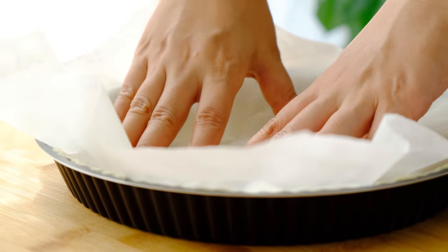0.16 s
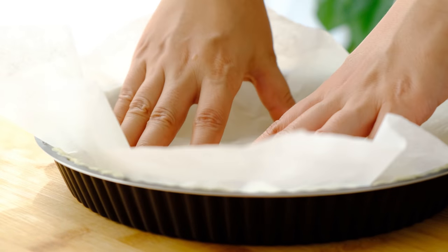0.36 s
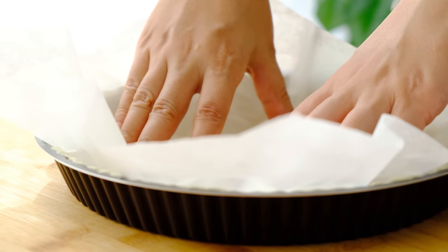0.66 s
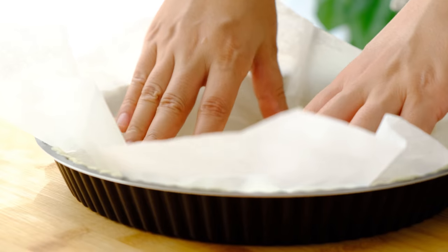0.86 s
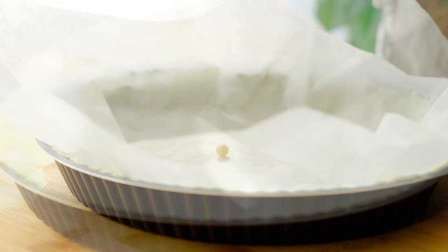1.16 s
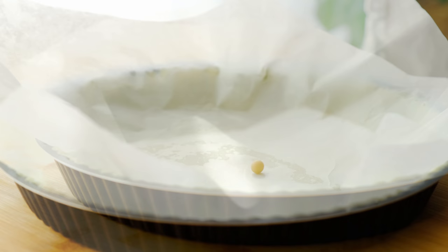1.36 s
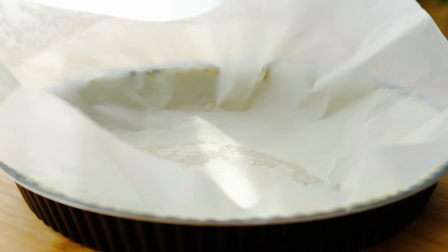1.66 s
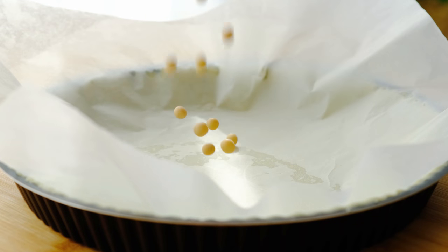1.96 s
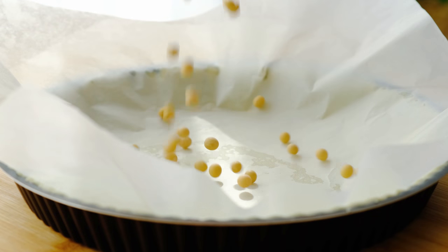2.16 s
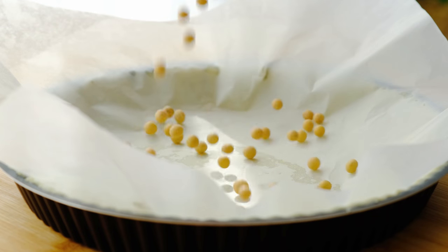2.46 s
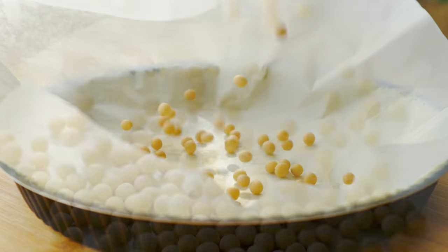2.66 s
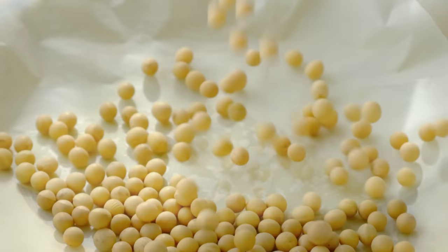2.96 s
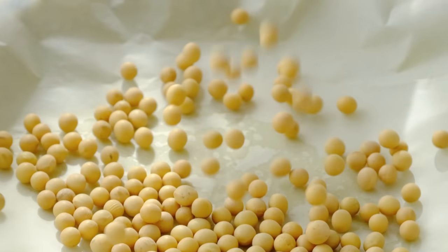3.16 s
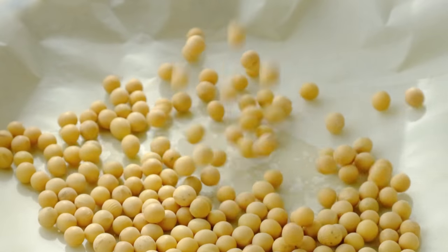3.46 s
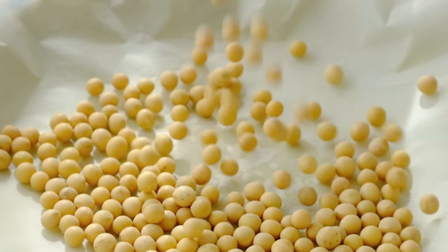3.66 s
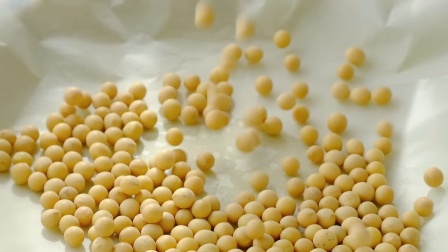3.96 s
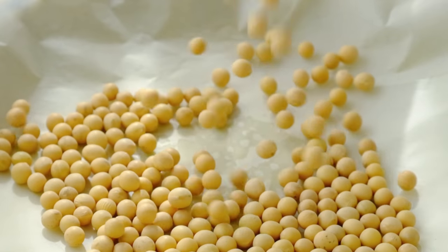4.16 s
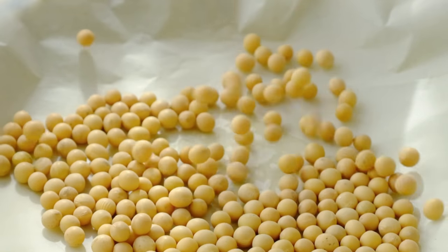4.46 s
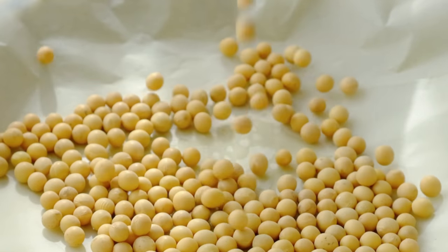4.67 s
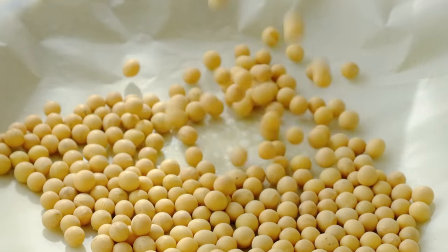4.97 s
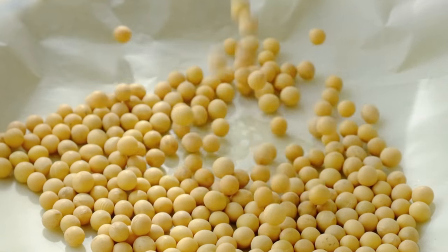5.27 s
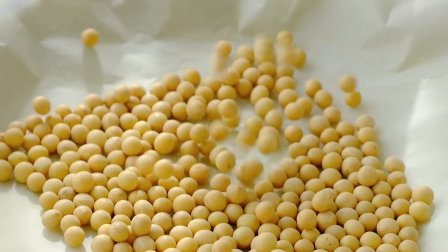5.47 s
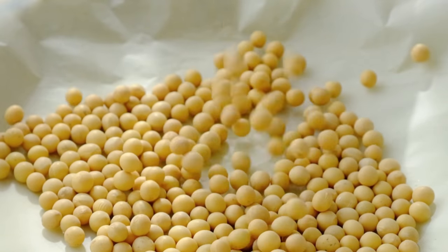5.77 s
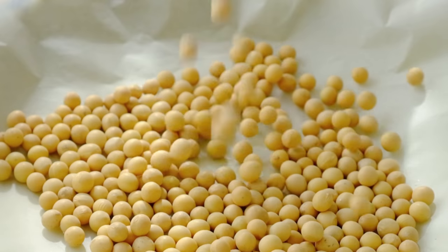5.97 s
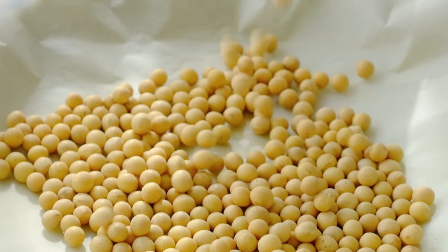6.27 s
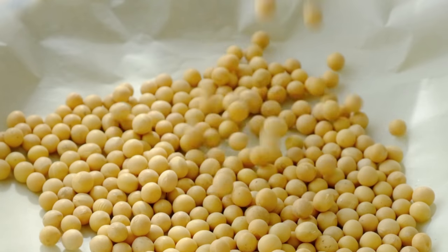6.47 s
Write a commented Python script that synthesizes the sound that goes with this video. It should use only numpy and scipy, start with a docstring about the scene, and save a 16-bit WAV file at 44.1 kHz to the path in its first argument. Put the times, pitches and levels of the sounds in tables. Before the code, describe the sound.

A close, detailed kitchen sound with short room reflections and thin bass. A faint low hum lies underneath at first and fades away. From 0 to 0.3 seconds stiff baking paper is pressed into a metal tin, crackling with dense creaks and bright ringing snaps; a pause, another crisp burst at 0.45 to 0.65, then smaller crinkles around 0.8 and single ticks until 1.1. It is nearly quiet until about 1.4. The first dried beans then tap, drum hollowly and roll on the bare sheet, becoming brighter and more crowded from 1.9 to 2.6, with a brief thinning near 2.7. At 2.8 a steady stream starts hitting other beans: hard, tiny, bright clicks over dry patter and pings, unevenly clumped, with occasional louder clicks and dull knocks. The tin's low drumming and hollow note slowly grow until the sound ends, still pouring, at 6.6.

```python
"""An appliance hums while baking paper is pressed into a tart tin and crinkles: ringing snaps over dense creaks.
The first dried beans drum and roll on the bare sheet: more snaps over low and bright rustle.
Then a steady stream rattles onto the growing heap: millisecond bean-on-bean clicks over patter, pings
and the longer drumming of the tin. A small kitchen answers with decaying noise."""
import sys
import numpy as np
from scipy import signal
from scipy.fft import rfft, irfft, next_fast_len
from scipy.io import wavfile
from scipy.ndimage import uniform_filter1d, map_coordinates

SR = 44100
rng = np.random.default_rng(int(sys.argv[2]) if len(sys.argv) > 2 else 0)


def bounce(signal):
    """Save signal as a 16-bit WAV file at the path given by the first command-line argument."""
    frames = np.transpose(np.atleast_2d(signal))
    limited = np.clip(frames, -1, 1)
    pcm = np.round(limited * 32767).astype(np.int16)
    wavfile.write(sys.argv[1], SR, pcm)


N = 291942


def amp(db):
    """Amplitude factor of a level in dB."""
    return 10 ** (np.asarray(db) / 20)


def unit(x):
    """x at an rms of one."""
    return x / np.sqrt(np.mean(x ** 2) + 1e-20)


def along(points, hz):
    """Interpolate (Hz, value) points on a log frequency axis."""
    f, v = np.transpose(points)
    return np.interp(np.log(hz + 1), np.log(f + 1), v)


def curves(rows):
    """One curve in dB per column after the time; -120 dB outside the rows."""
    s, *cols = np.transpose(rows)
    return [np.interp(np.arange(N) / SR, s, c, left=-120, right=-120) for c in cols]


def filtered(x, response):
    """Multiply the spectrum of x by a response of frequency."""
    m = next_fast_len(N + SR // 2)
    return irfft(rfft(x, m) * response(np.fft.rfftfreq(m, 1 / SR)), m)[:N]


def resonate(x, modes, order=1):
    """Causal resonances of alternating sign, applied order times; white noise keeps its level."""
    def shape(f):
        total = 0
        for k, (centre, width, db) in enumerate(modes):
            damping = 1j * f * width
            total = total + (-1) ** k * amp(db) * damping / (centre * centre - f * f + damping)
        return total ** order

    return filtered(x, shape) / np.sqrt(np.mean(abs(shape(np.arange(SR // 2))) ** 2))


def bursts(s, db, rise, t60):
    """Noise puffs that peak at times s: envelope slopes of 60 dB per rise seconds up and per t60 down."""
    t = np.arange(-SR // 20, SR // 20) / SR
    shape = amp(np.where(t < 0, 60 * t / rise, -60 * t / t60))
    blows = np.bincount(np.clip((s * SR).astype(int), 0, N - 1), amp(db), N)
    return signal.fftconvolve(blows, shape, "same") * np.sign(rng.standard_normal(N))


def rings(s, db, hz, cycles, swell=1.0):
    """Damped sines: each swells on a scale of swell cycles under a decay of 60 dB per given cycles."""
    t = np.arange(SR // 40) / SR
    turn = hz[:, None] * t
    decay = amp(db[:, None] - 60 * turn / np.reshape(cycles, (-1, 1)))
    wave = decay * (1 - np.exp(-turn / swell)) ** 2 * np.sin(2 * np.pi * turn)
    at = (s[:, None] * SR).astype(int) + np.arange(len(t))
    return np.bincount(at.ravel(), wave.ravel(), N + SR)[:N]


def swarm(count, spread_db, clump_db):
    """Random contact times in s and levels in dB; sizes have a long tail and come in clumps."""
    u = rng.random((count, 2))
    s = (np.arange(count) + 3 * u[:, 0]) / (count + 3) * N / SR  # a steady stream leaves no long gaps
    knots = rng.standard_normal(400)
    clumps = clump_db * map_coordinates(knots, [s * SR / N * 399])
    return s, -spread_db * np.log(1 - u[:, 1]) + clumps


def levelled(x):
    """Even out the slow level so that a control curve sets it."""
    return x / np.sqrt(abs(uniform_filter1d(x ** 2, size=SR // 12)) + 1e-12)


# Hum tones. Each row: pitch in Hz, rms level in dB before fade and waver.
HUM_TONES = [(99, -62.5), (199, -71.5)]
# Hum fade. Each row: time in seconds, gain of the first tone in dB, gain of the second in dB.
HUM_FADE = [(0, 0.5, -6.5), (1.351, -9, -4.5), (1.45, -4, -22), (1.7, -8, -20), (1.78, -13.5, -31),
            (6.62, -27, -30)]
# Spectrum shapes of still room and rumble. Each row: frequency in Hz, relative level in dB per Hz.
AIR_SHAPE = [(150, -42), (250, -5), (557, -8), (1160, -13), (1950, -8.5), (2910, -12.5), (3520, -8.5),
             (16000, -34)]
RUMBLE_SHAPE = [(15, -27.5), (40, 20), (150, 1), (300, -21), (600, -72)]


def background():
    """Two hum tones that waver together and fade, over shaped noise for room air and rumble."""
    t = np.arange(N) / SR
    waver_db = 3.1 * map_coordinates(rng.standard_normal(200), [t * 18])
    hum = 0
    for (hz, db), fade_db in zip(HUM_TONES, curves(HUM_FADE)):
        hum = hum + amp(db + fade_db + waver_db) * np.sqrt(2) * np.sin(2 * np.pi * hz * t)
    air = unit(filtered(rng.standard_normal(N), lambda hz: amp(along(AIR_SHAPE, hz))))
    rumble = unit(filtered(rng.standard_normal(N), lambda hz: amp(along(RUMBLE_SHAPE, hz))))
    return hum + amp(-67.5) * air + amp(-72.0) * rumble


# Decay of the room. Each row: frequency in Hz, t60 in seconds.
KITCHEN_T60 = [(300, 0.21), (1400, 0.15), (2000, 0.24), (3800, 0.25), (6500, 0.1), (15000, 0.0096)]


def kitchen(x):
    """Each frequency dies at its own speed; drawn afresh every 40 ms so that no single pitch rings on."""
    out, step = np.zeros(N + SR), SR // 25
    for start in range(0, N, step):
        hz, t, z = signal.stft(rng.standard_normal(SR // 3), SR, nperseg=256)
        decay = amp(-60 * t / along(KITCHEN_T60, hz)[:, None])
        tail = signal.istft(z * decay, SR, nperseg=256)[1]
        answer = signal.fftconvolve(x[start:start + step], tail / np.linalg.norm(tail))
        out[start + step // 8:][:len(answer)] += answer  # the first walls are some milliseconds away
    return out[:N]


ATTACK_DB_PER_S, RELEASE_DB_PER_S = 1798, 414
# Hands press the sheet. Each row: start in seconds, length in seconds, rustle in dB,
# low part in dB over the rustle, treble part in dB over the rustle.
HAND_PRESSES = [(-.03, 0.14, -41, 1, -39), (0.092, 0.18, -30, -6, -6), (0.46, 0.12, -33.5, -6, -7.5),
                (.6, 0.087, -52.5, -5, -12), (0.7, 0.077, -67, 11, 2), (0.796, 0.027, -35.5, 2, -16),
                (0.878, 0.037, -43, -4, -3.5)]


def presses():
    """Middle, low and treble rustle in dB: each press swells, holds and dies away."""
    t = np.arange(N) / SR
    start, length, db, low_db, top_db = np.transpose(HAND_PRESSES)[:, :, None]
    swell_db = ATTACK_DB_PER_S * np.maximum(start - t, 0)
    fall_db = RELEASE_DB_PER_S * np.maximum(t - start - length, 0)
    held = db - swell_db - fall_db
    return [np.max(held + part_db, axis=0) for part_db in (0, low_db, top_db)]


CRACK_DB = 13  # sharp edge over the peak
RING_S = 0.0037  # added to a panel's decay
FLUTTER_DB, FLUTTER_S = 1.5, .004  # strongest flutter over the snap, latest delay


def snap_rings(at, peak_db, sharp_db, hz):
    """A snapped panel of paper rings at its own pitch, cracks at the edge and flutters after it."""
    body_db = peak_db - sharp_db
    panel = rings(at - .0008, body_db + 3.5, hz, cycles=3 + RING_S * hz)
    crack = rings(at - .0004, peak_db + sharp_db + CRACK_DB, hz, cycles=5.8, swell=0.39)
    odds = rng.random((len(at), 3, 4))  # four flutters per snap
    flutter_s = (at[:, None] + FLUTTER_S * odds[:, 0]).ravel()
    flutter_db = (body_db[:, None] + FLUTTER_DB - 8 * odds[:, 1]).ravel()
    flutter_hz = (hz[:, None] * np.exp(0.4 * (odds[:, 2] - .5))).ravel()
    return panel + crack + rings(flutter_s, flutter_db, flutter_hz, cycles=7.9 + RING_S * flutter_hz)


# Skitter on the taut sheet. Each row: time in seconds, level in dB.
SKITTER_LEVEL = [(2.2, -68), (2.29, -37.5), (2.6, -32.5), (2.66, -53), (2.75, -38), (2.8, -70), (2.84, -45)]
# Taut sheet modes. Each row: centre in Hz, width in Hz, level in dB, all per filter pass.
TAUT_MODES = [(2180, 830, 0.66), (4200, 350, -1.6)]


def skittering(s, db):
    """Beans skitter on the sheet they have drawn taut: short puffs through its modes."""
    level, = curves(SKITTER_LEVEL)
    puffs = bursts(s[::3], np.minimum(db[::3], 9), 0.0025, 0.011)
    return amp(level) * levelled(resonate(puffs, TAUT_MODES, order=2))


TAP_DB, TAP_HZ = -8.5, 2580  # level over the rustle, middle pitch


def panel_taps(s, db, rustle_db):
    """Small taps ring the panels at scattered pitches."""
    luck = rng.standard_normal((2, len(s) // 8))
    hz = np.clip(TAP_HZ * np.exp(0.291 * luck[1]), 1200, 6000)
    taps = rings(s[::8], np.minimum(db[::8] + 4 * luck[0], 13), hz, cycles=16)
    return amp(rustle_db + TAP_DB) * levelled(taps)


LOUD_IS_SHARP, SHARP_FROM_DB = 0.3, -13  # per dB over this level a snap gains crack and loses ring
DULL_IS_NARROW = 0.17  # dB of middle noise lost per dB of missing treble
TIN_PRESSED_DB, TIN_PELTED_DB = -8, -10  # tin over the low rustle of presses, over the treble of beans
# Creases snapping and single beans landing. Each row: time in seconds, nominal peak in dB,
# low part in dB over the peak, treble part in dB over the peak, ring in Hz.
SHEET_SNAPS = [(0.027, -44, 16, -26, 910), (0.0545, -25, 1.5, -27, 2530), (0.076, -19, -5, -26, 1380),
               (0.101, -26, -6, -1, 3250), (0.106, -19, -1, -1, 5350), (0.1545, -23, -12.5, -2, 4290),
               (0.1645, -21, -16, 7.5, 4770), (0.205, -16, -10, 2.5, 2290), (0.214, -17, -15, 0, 2890),
               (0.2254, -18, -14, -3, 3100), (0.238, -17, -30, 3, 4750), (0.262, -14, -30, -7, 2090),
               (0.266, -19, -19, -16, 2110), (0.297, -14, -29, -2.5, 2490), (0.451, -18.5, -7, -14, 2850),
               (0.4998, -20.5, -4, 4, 3700), (0.507, -28, -9, -6, 3070), (0.513, -17, -8, -1, 2170),
               (0.5246, -17.5, -6.5, 1, 3900), (0.543, -16, -11, -6, 3130),
               (0.549, -17.5, -4.5, -2.5, 3650), (0.5532, -21, -10, -13, 2020),
               (0.597, -31.5, 4, -26, 3480), (0.642, -19.5, -13, -23, 4730), (0.696, -46.5, 9.5, -26, 1830),
               (0.713, -53, 13, -30, 1050), (0.747, -30.5, -11, -33, 600), (0.766, -35, -2, -30, 736),
               (0.7905, -20.5, -8, -3.5, 2900), (0.8029, -14, -10, -19, 3300), (0.811, -24, -10, -22, 2760),
               (0.833, -30, -2, -22, 5130), (0.867, -26.5, 2.5, -32, 5540), (0.9251, -31.5, 6.5, -11, 1370),
               (1.0752, -23.5, -16, -10.5, 4360), (1.286, -60, -3, -25, 830), (1.318, -55, -25, -19, 3000),
               (1.376, -50, -5, -25, 820), (1.419, -37, 0, -21, 4750), (1.4486, -28, -24, -28, 1680),
               (1.5, -38.5, -16, 9, 1290), (1.51, -34, -10, -1, 1410), (1.5207, -17.5, -30, -21, 3950),
               (1.5507, -17, -7, -34, 1230), (1.5549, -11.5, -18, -53, 1860),
               (1.5619, -21.5, -0.5, -35, 1030), (1.62, -41, 11, -27, 905), (1.656, -25, -16, -35, 1410),
               (1.682, -33, 8, -27, 1360), (1.718, -11.5, -12, -4, 2720), (1.752, -33, -22, -20, 1190),
               (1.7757, -15, -42, -15, 4790), (1.795, -20, -31, -19, 3940), (1.8199, -24.5, -7, -26, 1090),
               (1.8691, -21.5, -16, -5, 2640), (1.8757, -32, 1, 1, 2730), (1.9268, -16.5, -10, -5, 2500),
               (1.9414, -15, -2.5, -0.5, 4060), (1.956, -18, 4, -3, 2000), (1.967, -20.5, 5, -3, 2600),
               (2.0018, -22.5, -4.5, 6, 5300), (2.0082, -23.5, -1, 10, 2890), (2.0405, -19, -24, 2.5, 2240),
               (2.057, -31, -22, -15, 1590), (2.0662, -17.5, -0.5, 1.5, 3150), (2.0865, -20, -23, -3, 2070),
               (2.098, -22, -0.5, -5, 2440), (2.17, -28, -3, -11, 2300), (2.182, -18.5, -4, -3, 2130),
               (2.2087, -14, -11, 2.5, 4170), (2.2166, -18, -20, -2, 4100), (2.24, -11.5, -23, -16, 4160),
               (2.285, -16, -37, -6, 3950), (2.312, -23, -29, -16, 2030), (2.331, -15.5, -14.5, -8, 2110),
               (2.341, -16.5, -21, -1, 2220), (2.382, -19.5, -11, -22, 2240), (2.413, -25, -20, -3, 2200),
               (2.424, -14.5, -19, -4.5, 2480), (2.427, -20, -16, -11, 4170), (2.4595, -16, -6, 1.5, 2230),
               (2.481, -17, -13, -24, 1990), (2.4872, -23, -7, -3, 1680), (2.5, -32, -17, -20, 1900),
               (2.5341, -13, -40, -35.5, 3550), (2.5526, -15.5, -14, -10, 2200),
               (2.5584, -17.5, -15, -14, 2060), (2.562, -17, -11, -20, 1960),
               (2.5807, -20.5, -6, -22, 2110), (2.608, -11, -20, -13, 3900), (2.633, -41, -21, -30, 1690),
               (2.639, -23, -26, -13, 2530), (2.6588, -18, -43, -17, 4000), (2.695, -26.5, -26, -25, 1660),
               (2.7246, -28, -18, -22, 4240), (2.733, -41, -28, -19, 6450), (2.7602, -21, -55.5, -38, 3700),
               (2.7804, -29.5, -38, -1, 2200), (2.7857, -29, -35, -25, 4240), (2.814, -30, -34, -25, 3900)]
# First beans roll and skip. Each row: time in seconds, rustle in dB, low part in dB, treble in dB.
BEAN_ROLL = [(1.32, -90, -89, -94), (1.345, -54, -90, -54.5), (1.41, -51.5, -48.5, -71),
             (1.49, -43.5, -42.5, -48), (1.6, -46.5, -41.5, -71), (1.7, -37.5, -34, -55),
             (1.8, -52, -43, -59), (1.91, -37.5, -44.5, -70), (1.95, -33, -35, -39.5),
             (2.1, -29, -38.5, -30), (2.23, -37, -36.5, -41.5), (2.28, -34.5, -76, -42),
             (2.59, -38.5, -71, -39), (2.64, -66, -70, -64), (2.84, -66, -79, -73)]
# Modes of rolling, of the sheet's three parts and of the empty tin.
# Each row: centre in Hz, width in Hz, level in dB, all per filter pass.
ROLLING_MODES = [(855, 390, 0.87), (1700, 770, -1.2)]
LOW_MODES = [(820, 790, 4.5), (1310, 2700, 1)]
MID_MODES = [(2080, 1160, -1.5), (3210, 1030, 2.5), (4340, 2050, -1)]
TOP_MODES = [(5680, 3640, 0.3), (9700, 4400, 3), (13950, 9800, -1.5)]
EMPTY_TIN_MODES = [(224, 335, -0.5), (532, 910, 5.5)]


def sheet():
    """Dense creaks under single snaps; each shakes the low, middle and treble of the paper and the tin."""
    s, db = swarm(count=6000, spread_db=7.0, clump_db=-7.0)
    at, peak_db, low_db, top_db, hz = np.transpose(SHEET_SNAPS)
    sharp_db = LOUD_IS_SHARP * (peak_db - SHARP_FROM_DB)
    pressed, rolled = presses(), curves(BEAN_ROLL)
    mid, _, top = np.maximum(pressed, rolled)
    tin = np.maximum(pressed[1] + TIN_PRESSED_DB, rolled[2] + TIN_PELTED_DB)

    out = snap_rings(at, peak_db, sharp_db, hz) + skittering(s, db)
    rolling = resonate(bursts(s, db, .03, 0.036), ROLLING_MODES, order=2)
    out = out + amp(rolled[1]) * levelled(rolling)
    out = out + panel_taps(s, db, mid)
    # modes, creak level in dB, snap part in dB over its peak, snap t60 in s
    parts = [(LOW_MODES, pressed[1], low_db - 4.0, .014),
             (MID_MODES, mid, DULL_IS_NARROW * top_db + sharp_db, .009),
             (TOP_MODES, top, top_db + 0.5, .008),
             (EMPTY_TIN_MODES, tin, low_db - 10.0, .025)]
    for modes, level, part_db, t60 in parts:
        creak_db = np.minimum(db + rng.normal(0, 7.5, len(s)), 19)
        creaks = bursts(s, creak_db, 0.022, 0.77 * t60)
        out = out + amp(level) * levelled(resonate(creaks, modes, order=2))
        out = out + resonate(bursts(at, peak_db + part_db, 0.0058, t60), modes, order=2)
    return out


# Modes of a bean, the heap and the tin under it. Each row: centre in Hz, width in Hz, level in dB.
BEAN_MODES = [(9050, 4700, -1.2), (16300, 5200, -1.2)]
HEAP_MODES = [(2490, 1180, 0.6), (4240, 890, 6.5), (5410, 3550, 0.65)]
TIN_MODES = [(137, 110, -9), (326, 236, -4.5), (927, 964, -2)]
CLICK_DB, PATTER_DB, PING_DB, FIZZ_DB = -1, -3.5, -11, -12  # layers over the stream
DRUM_DB, DRUM_GROWS_DB_PER_S = -7.5, 1.16  # the filling tin drums louder
BOWL_HZ, BOWL_DB, BOWL_GROWS_DB_PER_S = 921, -17, 1.5  # the loaded tin's hollow note
CLICK_RISE_S, CLICK_T60_S = .0011, .0042
# Stream on the heap. Each row: time in seconds, strength in dB.
STREAM = [(2.81, -61), (2.85, -31), (3.05, -34), (3.38, -35.5), (3.43, -40.5), (3.5, -35.5), (3.9, -36),
          (4.05, -34), (4.25, -37), (4.44, -31.5), (4.48, -41), (4.55, -36), (5.03, -34.5), (5.16, -38),
          (5.3, -32), (5.56, -40), (5.7, -31.5), (5.96, -34), (6.3, -29.5), (6.62, -33.5)]


def stream():
    """One stream strength drives clicks, fizz, patter and pings, and the tin's growing drum and note."""
    s, db = swarm(count=1400, spread_db=1.5, clump_db=2.5)
    flow, = curves(STREAM)
    poured_s = np.arange(N) / SR - STREAM[0][0]
    chance = rng.standard_normal((len(s), 5))

    clicks = bursts(s, db + 3.8 * np.tanh(chance[:, 4]), CLICK_RISE_S, CLICK_T60_S)
    out = amp(flow + CLICK_DB) * levelled(resonate(clicks, BEAN_MODES))

    # countless faint clicks as the heap shifts
    faint_s, faint_db = swarm(count=12000, spread_db=4.0, clump_db=14.0)
    fizz = bursts(faint_s, faint_db, 0.00042, 0.0062)
    out += amp(flow + FIZZ_DB) * levelled(resonate(fizz, BEAN_MODES))

    patter = bursts(s, db + 3.2 * chance[:, 2], 0.0019, 0.032)
    out += amp(flow + PATTER_DB) * levelled(resonate(patter, HEAP_MODES))

    ping_hz = np.clip(2600 * np.exp(0.491 * chance[:, 1]), 700, 8000)
    pings = rings(s, db + 4 * chance[:, 0], ping_hz, cycles=16.5)
    out += amp(flow + PING_DB) * levelled(pings)

    drum = bursts(s, db + 3 * chance[:, 3], 0.058, 0.16)
    drum_level = flow + DRUM_DB + DRUM_GROWS_DB_PER_S * poured_s
    out += amp(drum_level) * levelled(resonate(drum, TIN_MODES))

    bowl_hz = BOWL_HZ * np.exp(0.094 * chance[::2, 1])
    hollow = rings(s[::2], db[::2] + 5 * chance[::2, 3], bowl_hz, cycles=23)
    bowl_level = flow + BOWL_DB + BOWL_GROWS_DB_PER_S * poured_s
    return out + amp(bowl_level) * levelled(hollow)


THUD_DB = -16  # tin over the patter part
# Loudest bean-on-bean clicks. Each row: time in seconds, peak in dB, patter part in dB over the peak.
LOUD_CLICKS = [(2.8226, -11.5, -28), (2.8446, -14, -13), (2.8882, -32, -12), (2.9483, -13, -5),
               (2.9547, -22, -12), (2.985, -14, -8), (3.0077, -18, 3), (3.0286, -12, -0.5),
               (3.0474, -16, -10), (3.057, -10.5, -8), (3.073, -19.5, 2.5), (3.09, -21, -20),
               (3.0985, -14, 0.5), (3.1296, -15, -23), (3.172, -16, -22), (3.2092, -13.5, -3),
               (3.2593, -11, -6.5), (3.312, -13, -15), (3.317, -15, -13), (3.33, -13, -14),
               (3.348, -11, -20), (3.3943, -10, -12.5), (3.5193, -15, -14), (3.5289, -10, -21),
               (3.592, -18, -11), (3.617, -16.5, -10), (3.651, -14.5, -17), (3.6752, -10, -7),
               (3.73, -20, -7), (3.7521, -11, -3), (3.78, -16, -16), (3.7914, -11, -25), (3.811, -19, -19),
               (3.8281, -13.5, -7), (3.8783, -10.5, -31), (3.9731, -15.5, 4), (4.012, -15, -8),
               (4.0893, -22, -13), (4.103, -13.5, -9.5), (4.131, -17, -16), (4.152, -13, -15),
               (4.164, -19, -17), (4.1746, -17, -5), (4.202, -15, 0), (4.2266, -12.5, -1), (4.238, -16, -3),
               (4.253, -21, -19), (4.2696, -9.5, -24), (4.2832, -11, -6.5), (4.293, -26, -13),
               (4.327, -20, 2), (4.3778, -13, -7), (4.3998, -20, -2.5), (4.434, -22, -10),
               (4.4574, -14.5, -3.5), (4.509, -20.5, 0.5), (4.557, -6.5, -15), (4.569, -22, -9),
               (4.5842, -17.5, 0.5), (4.6074, -16, -13), (4.649, -13.5, -11), (4.665, -14.5, -2.5),
               (4.691, -13.5, -3), (4.7, -14, -8), (4.7444, -9, -11), (4.7614, -12.5, -5),
               (4.7726, -13, -4), (4.8058, -13.5, -1.5), (4.8202, -13, -3.5), (4.852, -11, -30),
               (4.8733, -11, -23), (4.9177, -14, -22), (4.943, -10.5, -5), (4.951, -10.5, -5.5),
               (4.973, -15.5, -2), (4.999, -14, -6), (5.019, -11, -4), (5.031, -15.5, 0), (5.054, -17, -16),
               (5.069, -12.5, -0.5), (5.076, -12.5, -11), (5.0975, -24, -11), (5.113, -11.5, -28),
               (5.136, -19, -19), (5.1425, -12, -16), (5.19, -11.5, -8.5), (5.2653, -16, -0.5),
               (5.3289, -25, -5), (5.344, -15.5, -12), (5.396, -17, -21), (5.4434, -13.5, 0.5),
               (5.4516, -14.5, -7), (5.4697, -15, -21), (5.4844, -11.5, -12), (5.512, -11.5, -13),
               (5.5299, -14, -5), (5.5519, -13, -7), (5.5795, -13.5, -4.5), (5.624, -11.5, -13),
               (5.681, -14, -13), (5.6978, -16, -12), (5.802, -19, -2), (5.8163, -12, -3.5),
               (5.8298, -17, -2), (5.8512, -16, -8), (5.934, -8.5, -18), (5.955, -28, -16),
               (6.014, -18.5, 3.5), (6.04, -14.5, -5), (6.0451, -13, -3), (6.074, -9, -6.5),
               (6.0998, -19, -2), (6.128, -12, -18), (6.131, -11, -14), (6.139, -14, -9), (6.175, -16, -4),
               (6.187, -12, -12), (6.2006, -12, -9), (6.2269, -11, -6), (6.296, -19, -1), (6.3132, -14, -2),
               (6.321, -17, -1), (6.3436, -21, 3), (6.4133, -6, -9), (6.4394, -17, -7), (6.4869, -19, -8),
               (6.5225, -12, -5), (6.549, -12.5, -6), (6.5615, -18, -16), (6.571, -10.5, -14)]


def loud_clicks():
    """Hard collisions click, patter in the heap and thud in the tin."""
    at, peak_db, patter_db = np.transpose(LOUD_CLICKS)
    click = resonate(bursts(at, peak_db, 0.00054, 0.004), BEAN_MODES)
    thud = resonate(bursts(at, peak_db + patter_db + THUD_DB, 0.018, 0.032), TIN_MODES)
    patter = resonate(bursts(at, peak_db + patter_db - 0.5, 0.0011, 0.0033), HEAP_MODES)
    return click + thud + patter


# Beans landing deep in the heap. Each row: time in seconds, nominal peak in dB, ring in Hz.
DEEP_KNOCKS = [(3.0381, -25.5, 4120), (3.098, -15.5, 1950), (3.2608, -28, 4360), (3.5072, -26.5, 3450),
               (4.162, -23, 3930), (4.241, -20, 3260), (4.673, -22.5, 1210), (4.797, -22, 1880),
               (4.966, -24, 3230), (4.996, -23, 2390), (5.033, -23, 2780), (5.0933, -25.5, 2750),
               (5.3104, -22.5, 875), (5.3623, -21, 1530), (5.4732, -21, 870), (5.6147, -19.5, 1820),
               (5.769, -26, 830), (5.987, -28, 2950), (6.161, -24.5, 680), (6.2368, -23.5, 770),
               (6.3672, -25, 840), (6.4545, -27.5, 930), (6.5009, -25.5, 3930), (6.5472, -22, 920)]


def knocks():
    """A duller knock rings at its own pitch and shakes tin and heap; high knocks shake the heap more."""
    at, db, hz = np.transpose(DEEP_KNOCKS)
    ring = rings(at - .0008, db + 8.0, hz, cycles=15)
    tin = resonate(bursts(at, db - 10.0, 0.00088, 0.026), TIN_MODES)
    heap_db = db + 3.5 + 5 * np.log2(hz / hz.mean())
    return ring + tin + resonate(bursts(at, heap_db, 0.0058, 0.0038), HEAP_MODES)


def beans():
    """The stream with its loudest clicks and deep knocks standing out singly."""
    return stream() + loud_clicks() + knocks()


def scene():
    """Paper and heap, the kitchen's answer to both, and the background."""
    paper, heap = sheet(), beans()
    answer = kitchen(amp(-15.5) * paper + amp(-13.0) * heap)
    return (paper + heap + answer + background())[None]


TOP_HZ = 16650
# Tone of the whole sound. Each row: frequency in Hz, gain in dB.
OVERALL_TONE = [(20, -28), (70, -10.5), (120, -1.5), (15200, -3.5), (15700, -26), (17000, -53)]


def record(dry):
    """Thin bass, treble that stops steeply above 15 kHz, and nothing from TOP_HZ up."""
    return filtered(dry[0], lambda hz: amp(along(OVERALL_TONE, hz)) * (hz < TOP_HZ))[None]


dry = scene()
out = record(dry)
bounce(out)
```